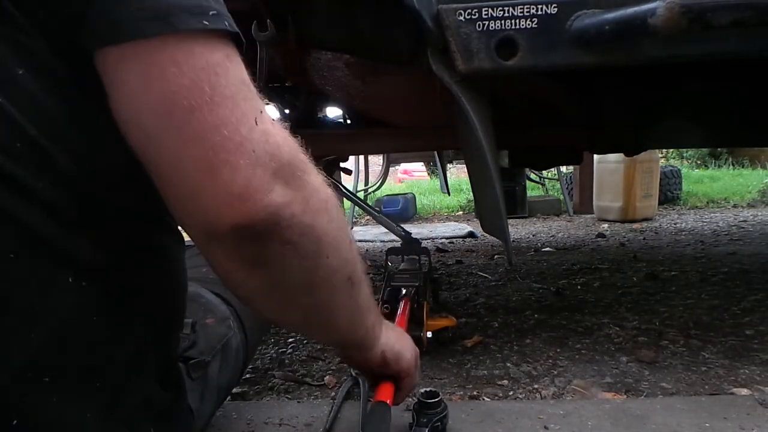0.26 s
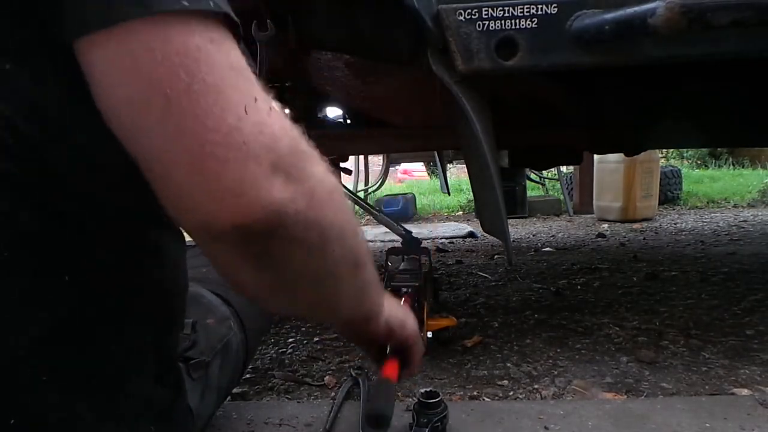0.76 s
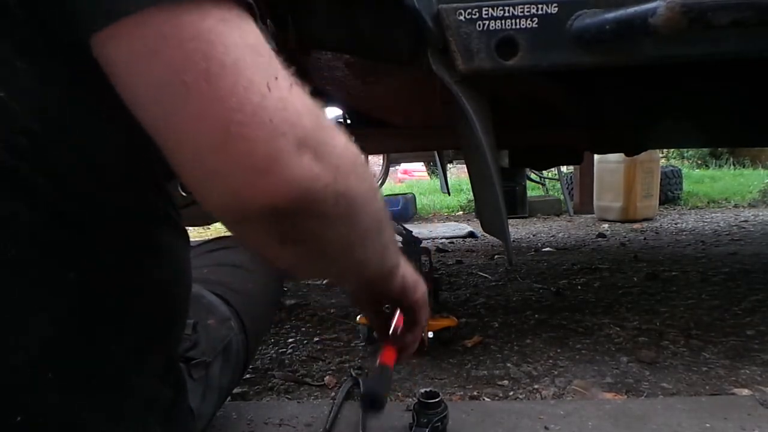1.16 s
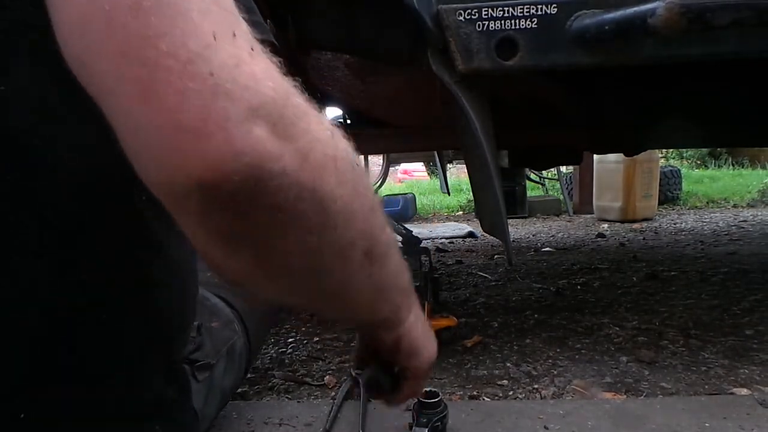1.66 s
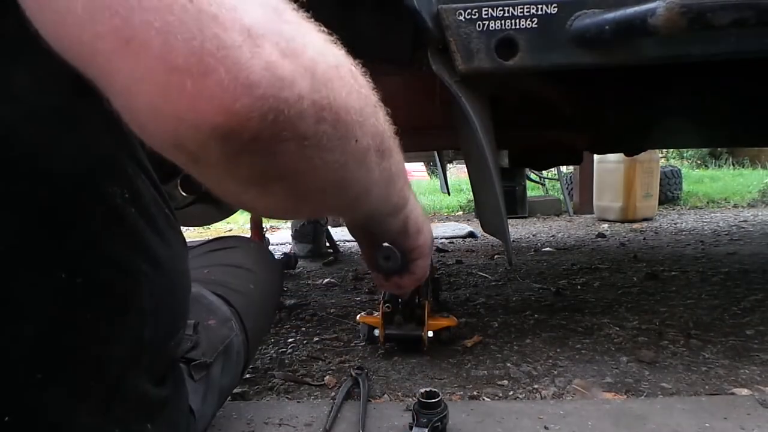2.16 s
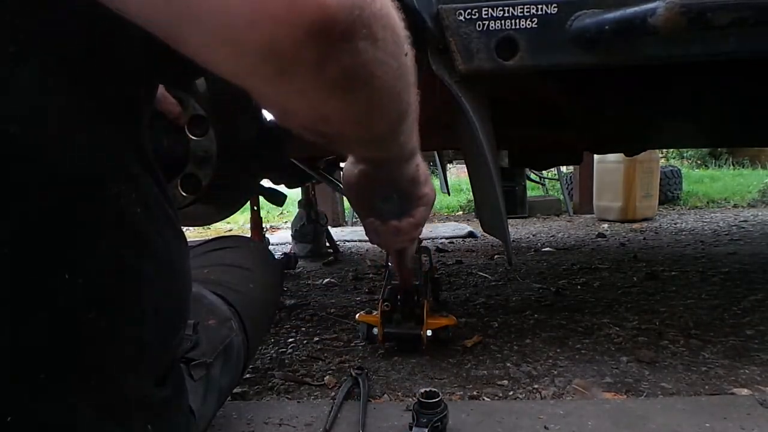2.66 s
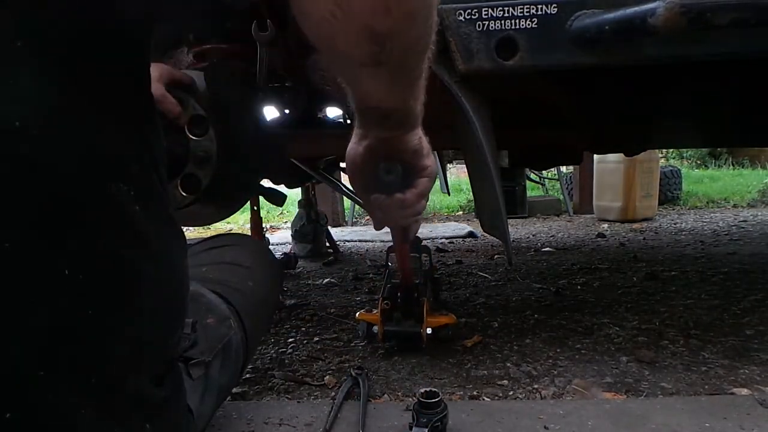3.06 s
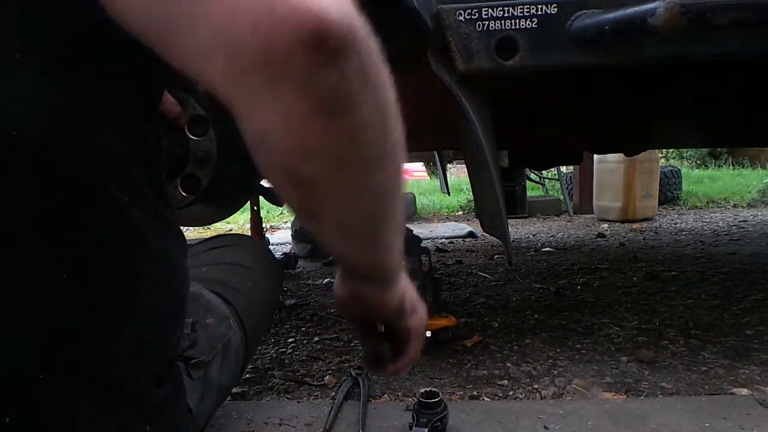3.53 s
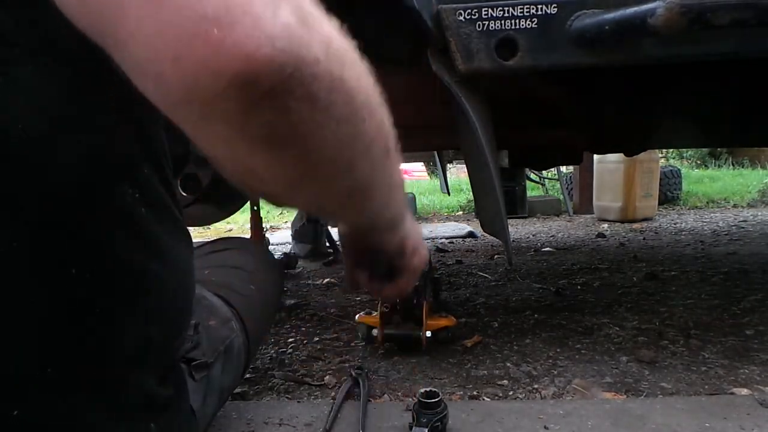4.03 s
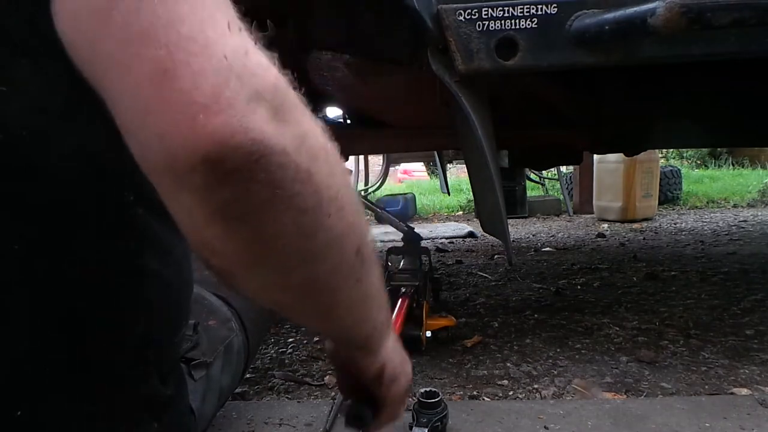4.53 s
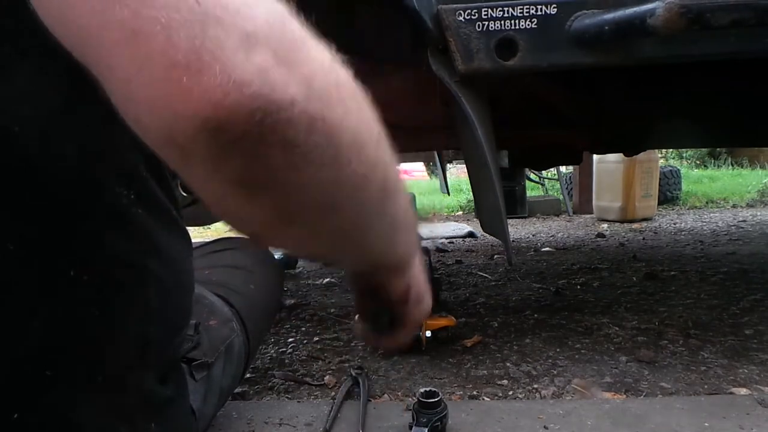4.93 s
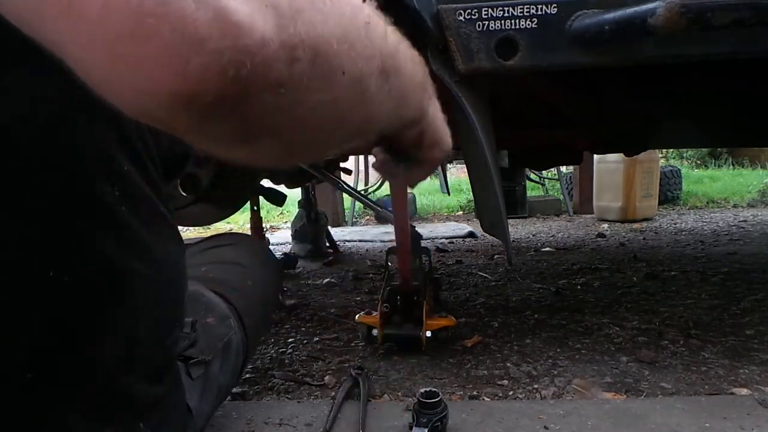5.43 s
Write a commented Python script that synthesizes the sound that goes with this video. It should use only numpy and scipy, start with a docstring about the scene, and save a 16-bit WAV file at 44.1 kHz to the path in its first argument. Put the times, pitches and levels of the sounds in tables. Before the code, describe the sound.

A trolley jack is worked close by, outdoors under a car. From 0 to about 1.4 seconds its loose steel tube handle clatters in the socket: quick, irregular clicks and knocks, some led by tiny scrapes, the firmest near 0.1, 0.2, 0.75 and 1.1. Knocks make the hollow tube hoot softly around a low-mid pitch for half a second and thud in the heavy frame; ground and underbody return a short, dense echo. Activity thins from 1.4 to 2.5, with a few light taps and dry gritty ticks. Clicks resume at 2.6 to 3.1, then the loudest, ringing double clank hits at 3.3. Lighter clicks cluster near 4.0, 4.35 and 4.7; a hard double clank lands at 5.0, with final clicks up to 5.7. Behind lie low rumble, thin hiss, faint hum and handling rustle. Soft pigeon-like coos are barely audible at 1.8 and 4.85, clearer at 5.1 and 5.5.

```python
"""Trolley jack under a car

A trolley jack is worked outdoors: its loose steel tube handle knocks, slides and clicks in the socket.
Shaped bursts of noise make the contacts; the gap between underbody and ground adds a short, dense echo.
Many knocks also make the air in the tube hoot (a fading sine), and contacts thud in the jack's frame.
Behind lie a low outdoor rumble, thin hiss, a faint hum, and soft cooing like a pigeon's, made of gliding sines.
"""
import sys
import numpy as np
from scipy import signal
from scipy.fft import rfft, irfft, next_fast_len
from scipy.io import wavfile
from scipy.ndimage import uniform_filter1d, map_coordinates

SR = 44100
rng = np.random.default_rng(int(sys.argv[2]) if len(sys.argv) > 2 else 0)


def generate_wav(signal):
    """Clip the signal to [-1, 1] and save it as 16-bit WAV at the path in sys.argv[1]."""
    frames = np.transpose(np.atleast_2d(signal))
    scaled = np.clip(frames, -1, 1) * 32767
    pcm = np.round(scaled).astype(np.int16)
    wavfile.write(sys.argv[1], SR, pcm)


N = 250929  # length in samples

TYPICAL_BODY_DB = -51  # weight (level + body) of an ordinary contact
LOW_RING_HZ, HIGH_RING_HZ = (861, 1537), (5700, 10500)  # ranges for a spot's two side resonances
SPOT_DB, SPOT_PER_SPARKLE = 8, -0.2  # a blunt contact rings its spot more purely than a sharp one
FIZZ_DB, FIZZ_PER_SPARKLE = -6.5, 1.0  # the top octave follows the sparkle

# Tone colour of a blow [f/Hz, relative level per Hz/dB]
BLOW_COLOUR = [(60, -34), (120, -19), (380, -12.5), (620, -13), (830, -11), (1150, -13), (1750, -3.5),
               (2300, 2.5), (3000, -0.5), (3750, 2), (4750, 0), (5800, -3.5), (9800, -2.5), (13600, -9.5),
               (15000, -29)]
# Typical depth of the steel's close resonances [f/Hz, depth/dB]
RIPPLE_DEPTH = [(500, 2), (3000, 2.5), (9000, 4.5), (13000, 5.5)]
# Handle against socket; body, sparkle and scrape are relative levels
# [t/s, level/dB, body/dB, sparkle/dB, touched spot's resonance f/Hz, lead-in scrape/dB]
CONTACTS = [(.002, -54, -7, -4, 2640, 3), (0.034, -52.5, 3.5, -24, 2540, -32),
            (0.074, -32, -6, -20.5, 4350, -11), (.19, -33.5, -10, -12.5, 2680, -5),
            (0.2132, -41.5, -17, -7.5, 2660, -7), (0.3479, -53, -4, -5.5, 3960, -7),
            (0.3649, -45.5, -27, -7.5, 3020, 0), (0.3757, -39.5, 2.5, -30, 2010, -29),
            (0.4484, -50.5, -10, 2, 3400, -13), (0.4748, -45, -1, -11, 3320, -1),
            (0.4976, -46, -3, -8, 2200, -7), (0.6032, -53, 1.5, -31, 2600, -24),
            (.6495, -43.5, -4, -18.5, 4080, -12), (.6622, -44.5, 2.5, -27, 2070, 4),
            (.748, -35, -12, -12.5, 3700, -9), (0.775, -39, -15, -3.5, 2700, -2),
            (.9844, -50, -3, -6, 4270, 12), (1.0286, -42, -6, -3, 3360, -10),
            (1.0441, -46.5, -3.5, -11, 4440, 5), (1.122, -37, -6, -26, 2390, -6),
            (1.148, -43, -0.5, -41, 3620, 7), (1.1816, -51, 8.5, -10.5, 1690, 1),
            (1.209, -64.5, 13.5, -15, 1680, 16), (1.278, -63.5, 3, -25, 3950, -13),
            (1.3514, -74, 14, 1, 2100, -16), (1.7626, -48, -2.5, -3, 4200, -8),
            (1.7993, -50.5, 0.5, -2, 4160, -12), (2.072, -60.5, 8.5, -19, 2260, -1),
            (2.556, -65.5, -7, -30, 2640, -5), (2.6047, -51, 0, -15, 2310, -8),
            (2.6784, -58.5, 0.5, -20, 1860, 3), (2.7016, -53.5, -8, -18, 2340, -1),
            (2.8092, -62.5, -1, -16, 3400, -12), (2.857, -38.5, -9, -12.5, 4010, -3),
            (2.9239, -55.5, -1.5, -15, 2050, 8), (3.0457, -49, -5, -26, 1960, -13),
            (3.0626, -47.5, 1, -18.5, 2136, 0), (3.2723, -39.5, -4, 1.5, 4600, -46),
            (3.282, -20.5, -20.5, -12, 4020, -16.5), (3.2952, -27.5, -10, -16.5, 2240, 0),
            (3.5834, -53.5, 5, -21, 2584, -16), (3.7772, -66.5, 1.5, -8.5, 2840, -5),
            (3.9841, -48, -4.5, -5, 3380, -17), (4.0291, -48.5, -5, -9.5, 2500, -7),
            (4.217, -71.5, 7.5, -20, 2660, -10), (4.284, -63.5, -6, -5.5, 2690, -5),
            (4.3275, -48, -13.5, -4.5, 3380, -18), (4.3632, -42.5, -8, -16, 2760, -18),
            (4.3807, -45, -12, -9.5, 2770, 2), (4.6283, -56, 2, -9.5, 3980, -4),
            (4.6854, -50.5, 0.5, -14, 1480, -7), (4.7011, -45, -10.5, -4, 4260, -33),
            (5.0035, -25, -18, -17, 2590, -23), (5.0144, -29.5, -12.5, -7, 2700, -14),
            (5.0613, -45.5, -6.5, -4.5, 2730, -12), (5.2699, -53, 1.5, -4, 4350, -7),
            (5.351, -48.5, -3, -5.5, 4230, -4), (5.4768, -49, -0.5, -23, 2525, -26),
            (5.6542, -37, -5, -1, 6080, -7), (5.6844, -35.5, -12.5, -22, 2530, -2)]


def clatter(crack_db=2, crack_t60=0.024, rise=0.0058, low_db=6, high_db=6,
            low_width=0.11, spot_width=0.049, high_width=0.068,  # shares of each resonance's pitch
            same_share=0.44, scrape_time=0.012, square_db=-32, least_slide=0.23):
    """Each contact scrapes in, cracks, rings the touched spot and fills the space under the car."""
    out, t = np.zeros(N), np.arange(SR * 2 // 5) / SR
    cavity = echo(t)
    places = rng.random((len(CONTACTS), 2))
    for (s, db, body, sparkle, spot_hz, scrape_db), (low_place, high_place) in zip(CONTACTS, places):
        # light contacts swell in more slowly, hard blows land squarely
        sliding = np.clip((square_db - db) / 10, least_slide, 1)
        lead = int(min(scrape_time, max(s, 0.001)) * SR)
        # part of the echo path stays, part changes as handle and arm move
        tail = np.sqrt(same_share) * cavity + np.sqrt(1 - same_share) * echo(t)
        crack = amp(crack_db - 60 * t / crack_t60) * rng.standard_normal(len(t))
        answer = (tail + crack) * (1 - np.exp(-np.pi * t / (rise * sliding)))
        # a short scrape leads into the blow itself, and both get the same answer
        force = np.append(amp(scrape_db) * scrape(lead), 1)
        hit = signal.fftconvolve(force, answer)[:len(t)]
        # every spot on the steel favours its own resonances: (Hz, width, dB)
        modes = [(np.interp(low_place, [0, 1], LOW_RING_HZ), low_width, low_db),
                 (spot_hz, spot_width, SPOT_DB + SPOT_PER_SPARKLE * sparkle),
                 (np.interp(high_place, [0, 1], HIGH_RING_HZ), high_width, high_db)]

        def colour(hz):
            spot = sum(gain / (1 + ((hz / centre - 1) / width) ** 2) for centre, width, gain in modes)
            fine = along(RIPPLE_DEPTH, hz) * ripple(hz, 200)
            return along(BLOW_COLOUR, hz) + spot + fine

        blow = resonate(hit, colour)
        # heavy contacts have more body, sharp edges more sparkle and fizz: (low Hz, high Hz, dB)
        fizz = FIZZ_DB + FIZZ_PER_SPARKLE * sparkle
        parts = [(40, 1600, body), (1600, 5800, 0), (6300, 10500, sparkle), (11500, 20000, fizz)]
        sound = sum(amp(db + level) * crest(band(blow, lo, hi)) for lo, hi, level in parts)
        add(out, s - lead / SR, sound)
    return out


# How long the echo under the car takes to fall by 60 dB [f/Hz, fade time/s]
ECHO_FADE = [(100, 0.25), (330, 0.27), (900, 0.22), (2000, 0.15), (4500, 0.14), (9000, 0.18), (15000, 0.14)]


def echo(t):
    """Dense reflections between underbody and ground: noise whose pitch ranges each fade at their own speed."""
    hz, s, z = signal.stft(rng.standard_normal(len(t)), SR, nperseg=256)
    fading = z * amp(-60 * s / along(ECHO_FADE, hz)[:, None])
    return signal.istft(fading, SR, nperseg=256)[1][:len(t)]


def scrape(length):
    """Steel catches and slips on steel in tiny jerks, pressing harder until it seats; energy 1."""
    t = np.arange(length) / SR
    jerks = amp(4 * map_coordinates(rng.standard_normal(200), [t * 600]))  # 600 random levels a second
    force = rng.standard_normal(length) * jerks * np.linspace(0.05, 1, length)
    return force / np.linalg.norm(force)


def ripple(hz, width_hz):
    """Many close resonances: a random, smooth curve over frequency."""
    return map_coordinates(rng.standard_normal(600), [hz / width_hz], mode="wrap")


# a typical knock, its ring in the wall, dB of ring per dB of knock
FIRM_DB, WALL_DB, WALL_GROWS = -34, -47.5, 1.9
# Knocks that set the whole tube ringing [t/s, strength as a level/dB]
KNOCKS = [(0, -42.5), (.08, -34.5), (.38, -32.5), (.654, -35), (1.036, -44.5), (1.124, -35), (1.361, -45),
          (2.079, -63), (2.62, -53), (2.862, -49.5), (3.06, -46), (3.287, -27.5), (3.99, -58), (4.37, -62),
          (4.69, -63), (5.005, -41.5), (5.48, -48.5)]


def tube(air_hz=468.6, t60=0.51, swell=0.026,
         clonk_db=-8, clonk_t60=0.13, clonk_lo_hz=620, clonk_hi_hz=900):
    """A knock clonks, then the air in the open handle swells and rings on; hard knocks bring in the wall."""
    out, t = np.zeros(N), np.arange(SR) / SR
    hoot = np.sin(2 * np.pi * air_hz * t) * amp(-60 * t / t60) * (1 - np.exp(-t / swell))
    onset = 1 - np.exp(-t / 0.0033)
    for s, db in KNOCKS:
        clonk = band(rng.standard_normal(SR), clonk_lo_hz, clonk_hi_hz) * amp(-60 * t / clonk_t60)
        wall = amp(WALL_DB + WALL_GROWS * (db - FIRM_DB)) * crest(steel(t) * onset)
        add(out, s, amp(db) * (hoot + amp(clonk_db) * crest(clonk * onset)) + wall)
    return out


# Ringing of the tube's wall; width is taken at half height [f/Hz, width/Hz, relative level/dB]
WALL_MODES = [(718, 13, 2.5), (1223, 35, -7), (1495, 35, 0), (1780, 64, -3.5), (2000, 140, -3),
              (2374, 50, -4), (2640, 210, -8.5), (3430, 73, -5), (3642, 42, 0), (3860, 50, -9.5),
              (4280, 130, -11), (4630, 80, -10), (4780, 80, -6), (6660, 85, -18.5)]


def steel(t, t60=0.36, dense_db=-17):
    """The tube wall rings roughly: clusters of close modes stand out of many weaker ones."""
    def clusters(f):
        power = sum(amp(db) ** 2 / (1 + (2 * (f - hz) / width) ** 2) ** 2 for hz, width, db in WALL_MODES)
        return np.sqrt(power)

    wall = filtered(rng.standard_normal(len(t)), clusters)
    dense = amp(dense_db) * band(rng.standard_normal(len(t)), 700, 4600)
    return (wall + dense) * amp(-60 * t / t60)


def frame(frame_hz=327, t60=0.11, thud_db=-65, grows=1.1, knock_share=0.36, rise=0.003):
    """The weight of each contact thuds in the jack's frame: a short low tone with some noise."""
    out, t = np.zeros(N), np.arange(SR // 2) / SR
    envelope = amp(-60 * t / t60) * (1 - np.exp(-t / rise))
    for s, db, body, *_ in CONTACTS:
        knock = unit(band(rng.standard_normal(len(t)), 180, 390))
        thud = (np.sin(2 * np.pi * frame_hz * t) + knock_share * knock) * envelope
        add(out, s, amp(thud_db + grows * (db + body - TYPICAL_BODY_DB)) * crest(thud))
    return out


# Light ticks [t/s, level/dB]
TICKS = [(1.978, -64), (2.311, -64), (2.379, -69), (4.984, -54), (5.52, -67), (5.586, -74)]


def grit(t60=0.035):
    """Tiny dry ticks of grit and loose parts: short bursts of mid to high noise."""
    out, t = np.zeros(N), np.arange(SR // 10) / SR
    for s, db in TICKS:
        tick = band(rng.standard_normal(len(t)), 1800, 7000) * amp(-60 * t / t60)
        add(out, s, amp(db) * crest(tick))
    return out


# Far cooing; sag is the share by which the pitch has dropped at the end, level is before the waver
# [t/s, length/s, highest pitch f/Hz, sag/share, level/dB]
COOS = [(1.78, 0.28, 541, 0.0054, -71), (4.85, 0.1, 470, 0.018, -67), (5.06, 0.285, 430.5, 0.053, -53),
        (5.53, 0.184, 476, 0.16, -54)]


def cooing(waver_db=6.5, crown=0.4, fullest=0.61):
    """Nearly pure, low notes: each swells and fades while its pitch arches and sags."""
    out = np.zeros(N)
    for s, length, hz, sag, db in COOS:
        u = np.linspace(0, 1, int(length * SR))  # place within the note
        pitch = hz * (1 - sag * ((u - crown) / (1 - crown)) ** 2)
        swell = np.sin(np.pi / 2 * np.interp(u, [0, fullest, 1], [0, 1, 0]))
        add(out, s, amp(db) * swell * np.sin(2 * np.pi * np.cumsum(pitch) / SR))
    return out * amp(waver_db * wobble(21.94))


# Tone colour of the outdoor air [f/Hz, relative level per Hz/dB]
AIR_COLOUR = [(20, -25), (40, -9), (75, -1), (115, -10), (200, -12), (400, -17), (630, -19), (1000, -21),
              (2000, -26), (4200, -30.5), (9000, -32), (14500, -35)]
# Hum tones, around which pitch and level wander [f/Hz, level/dB]
HUM_TONES = [(74, -74), (98, -72.5), (426, -77)]


def outdoors(rumble_db=-71, hiss_db=-78, shudder_db=-61.5, rustle_db=-72.5, drift_hz=1.1):
    """Far rumble, thin hiss and a faint unsteady hum; the worked jack adds a low shudder and a rustle."""
    air = filtered(rng.standard_normal(N), lambda hz: amp(along(AIR_COLOUR, hz)))
    below, above = unit(band(air, 20, 600)), unit(band(air, 600, 20000))
    shudder = amp(shudder_db) * stir(grows=0.45, lead_s=0.33, t60=1.1)
    rustle = amp(rustle_db) * stir(grows=0.58, lead_s=0.44, t60=1.6)
    low = np.hypot(amp(rumble_db), shudder) * amp(2.5 * wobble(9.1)) * below
    high = np.hypot(amp(hiss_db), rustle) * amp(1.2 * wobble(7.1)) * above
    hum = np.zeros(N)
    for hz, db in HUM_TONES:
        level = amp(db + 3.6 * wobble(3))
        pitch = hz + drift_hz * wobble(2.2)
        hum += level * np.sin(2 * np.pi * np.cumsum(pitch) / SR)
    return low + high + np.sqrt(2) * hum  # a sine of rms 1 peaks at sqrt(2)


def stir(grows, lead_s, t60):
    """Gain of the handling noise: it builds up to each contact, by its weight, and dies away after it."""
    t = np.arange(0, N, 64) / SR
    power = np.zeros(len(t))
    for s, db, body, *_ in CONTACTS:
        weight = grows * (db + body - TYPICAL_BODY_DB)
        power += amp(weight - 60 * np.maximum((s - t) / lead_s, (t - s) / t60)) ** 2
    return np.interp(np.arange(N) / SR, t, np.sqrt(power))


def amp(db):
    """Turn decibels into a plain factor."""
    return 10 ** (np.asarray(db) / 20)


def unit(x):
    """x at rms 1."""
    return x / np.sqrt(np.mean(x ** 2) + 1e-20)


def crest(x):
    """x scaled so that its loudest 8 ms have rms 1."""
    return x / np.sqrt(np.max(uniform_filter1d(x ** 2, SR // 125)) + 1e-20)


def along(points, hz):
    """(Hz, value) points read on a log axis."""
    f, v = np.transpose(points)
    return np.interp(np.log(hz + 1), np.log(f + 1), v)


def wobble(rate):
    """A smooth random curve, rate knots a second."""
    knots = rng.standard_normal(int(N * rate / SR) + 4)
    return map_coordinates(knots, [np.arange(N) * rate / SR])


def filtered(x, gain):
    """x times a gain that depends on frequency."""
    n = x.shape[-1]
    m = next_fast_len(n + 8192)
    return irfft(rfft(x, m) * gain(np.fft.rfftfreq(m, 1 / SR)), m)[..., :n]


def band(x, lo_hz, hi_hz):
    """The part of x between two soft edges."""
    return filtered(x, lambda hz: (1 - 1 / (1 + (hz / lo_hz) ** 8)) / (1 + (hz / hi_hz) ** 8))


def resonate(x, colour_db):
    """x through a causal filter with the given dB curve: its peaks ring on afterwards."""
    m = next_fast_len(2 * len(x))
    cepstrum = irfft(np.log(amp(colour_db(np.fft.rfftfreq(m, 1 / SR)))), m)
    # folding the cepstrum forward puts all the ringing after the blow (minimum phase)
    cepstrum[1:m // 2] *= 2
    cepstrum[m // 2 + 1:] = 0
    return irfft(rfft(x, m) * np.exp(rfft(cepstrum)), m)[:len(x)]


def add(track, s, sound):
    """Mix a sound into a track from time s."""
    start = int(np.clip(round(s * SR), 0, N - 1))
    track[start:start + len(sound)] += sound[:N - start]


def scene(side_db=-22):
    """Everything lies straight ahead; only a weak side reflection widens the clatter and grit."""
    metal = clatter() + grit()
    mid = metal + tube() + frame() + cooing() + outdoors()
    side_colour = [(300, -12.5), (2000, -29.5), (12000, -9.0)]  # (Hz, dB), on top of side_db
    reflection = filtered(metal, lambda hz: amp(along(side_colour, hz)))
    side = np.zeros(N)
    add(side, 0.0012, amp(side_db) * reflection)
    return np.array([mid + side, mid - side])


def record(dry, top_hz=14700):
    """A very steep filter removes the treble above top_hz."""
    return filtered(dry, lambda hz: 1 / (1 + (hz / top_hz) ** 120))


dry = scene()
out = record(dry)
generate_wav(out)
```